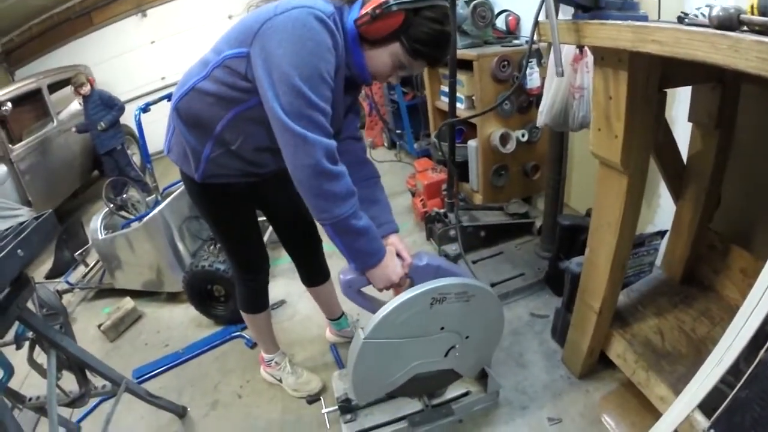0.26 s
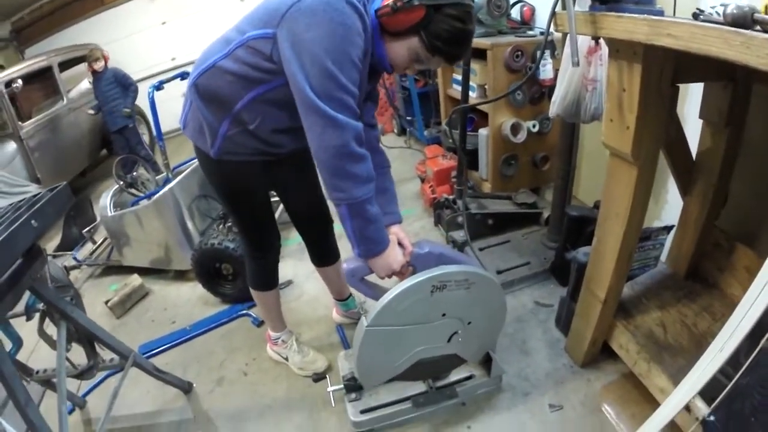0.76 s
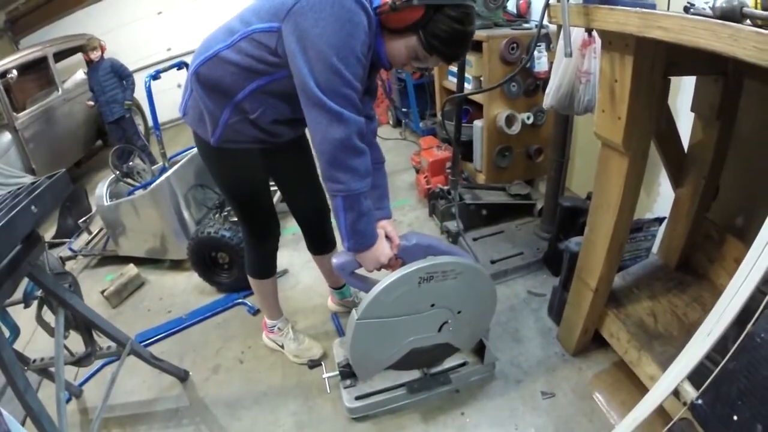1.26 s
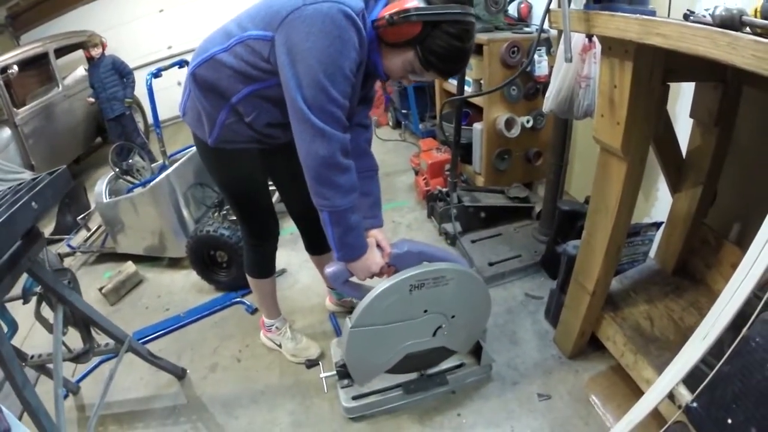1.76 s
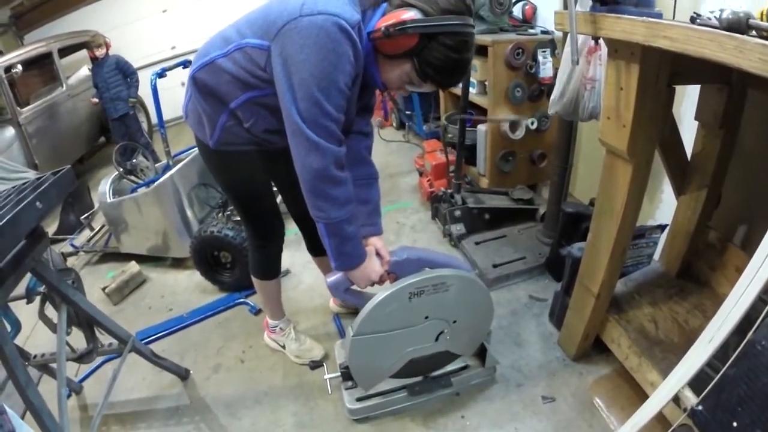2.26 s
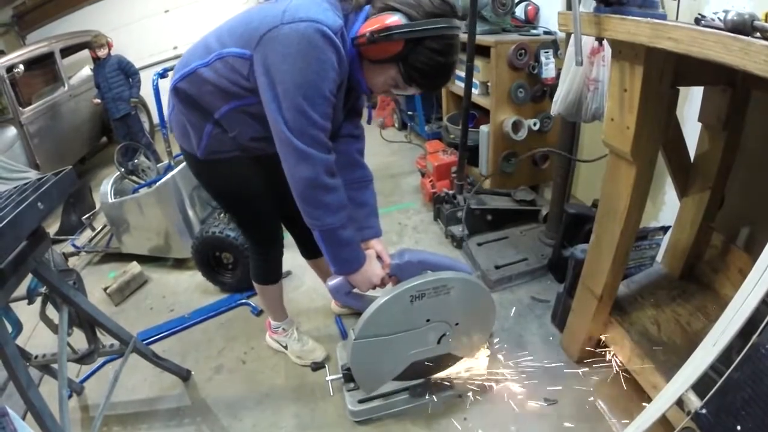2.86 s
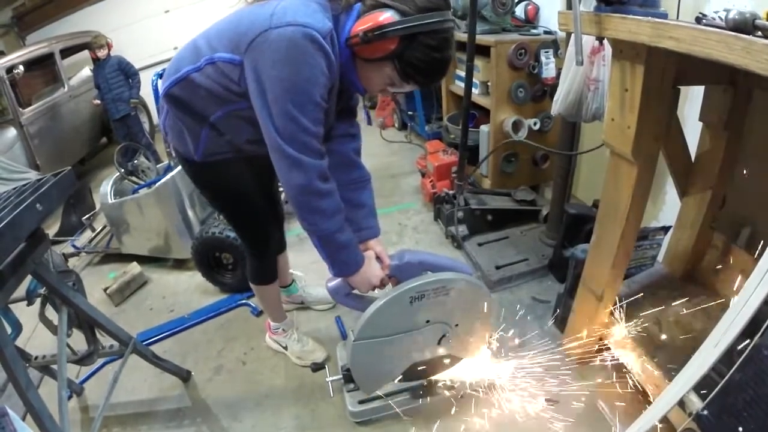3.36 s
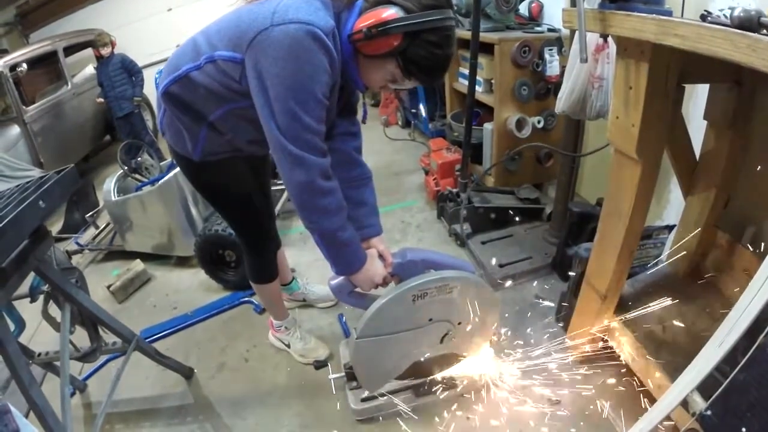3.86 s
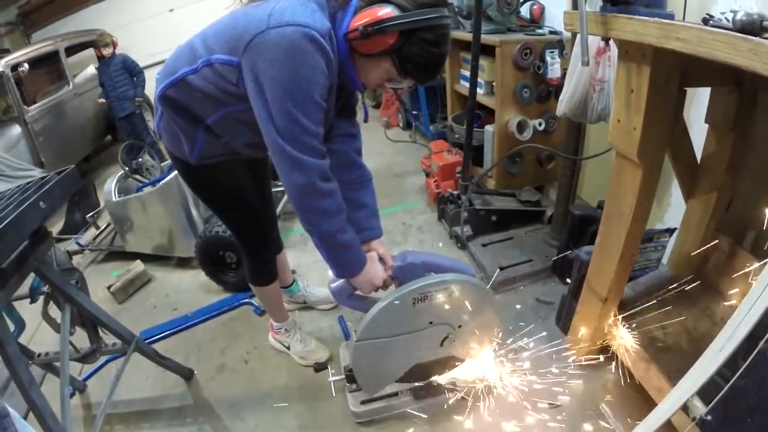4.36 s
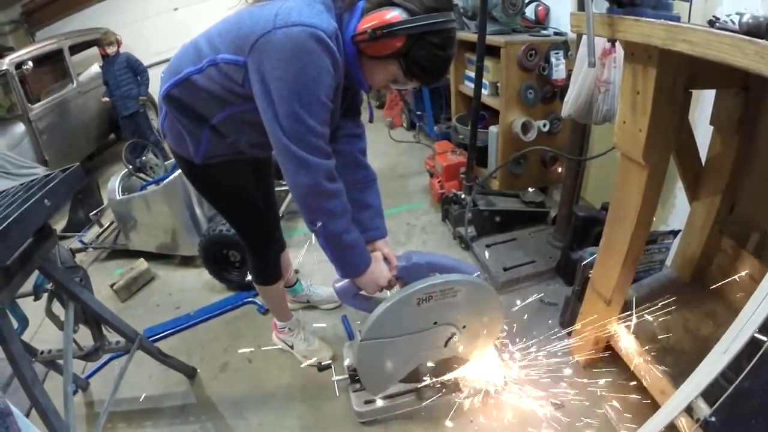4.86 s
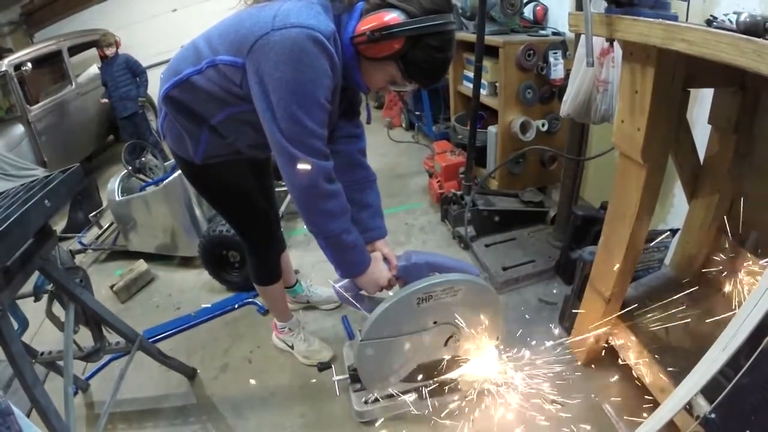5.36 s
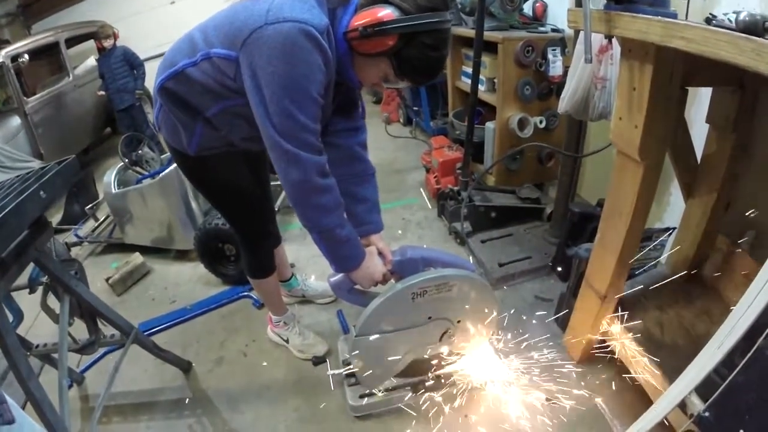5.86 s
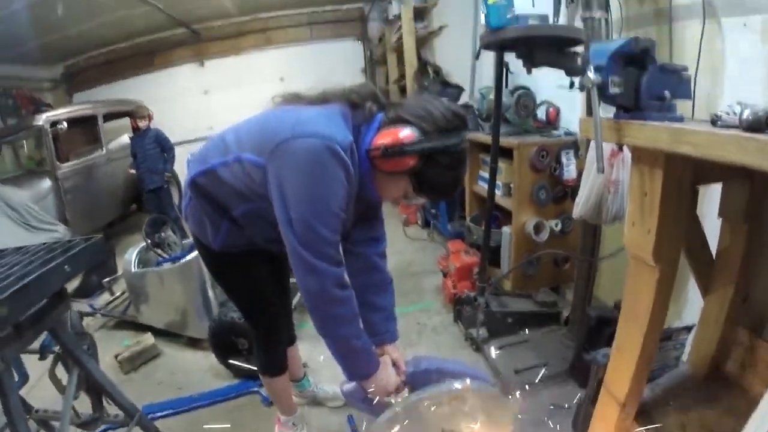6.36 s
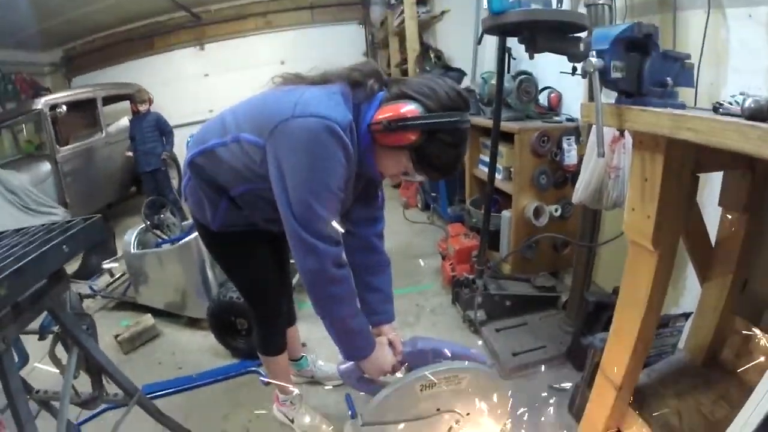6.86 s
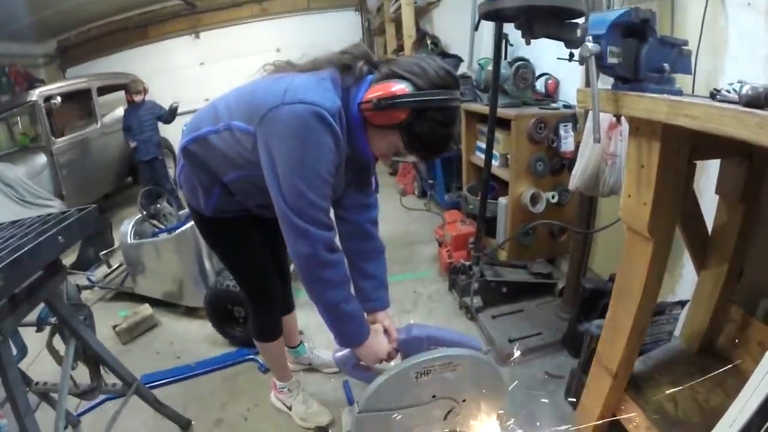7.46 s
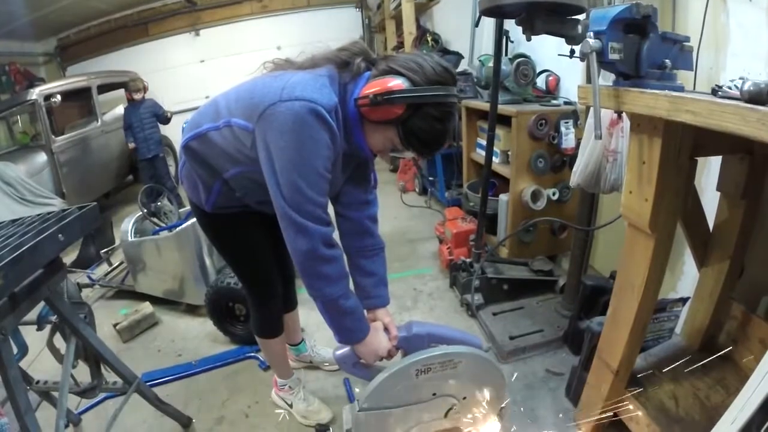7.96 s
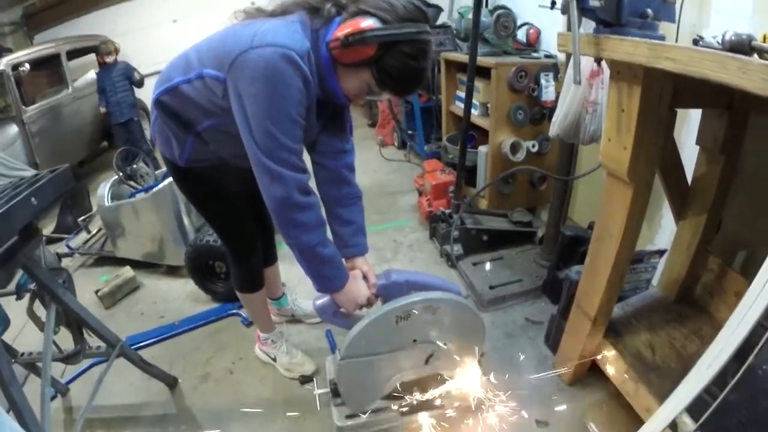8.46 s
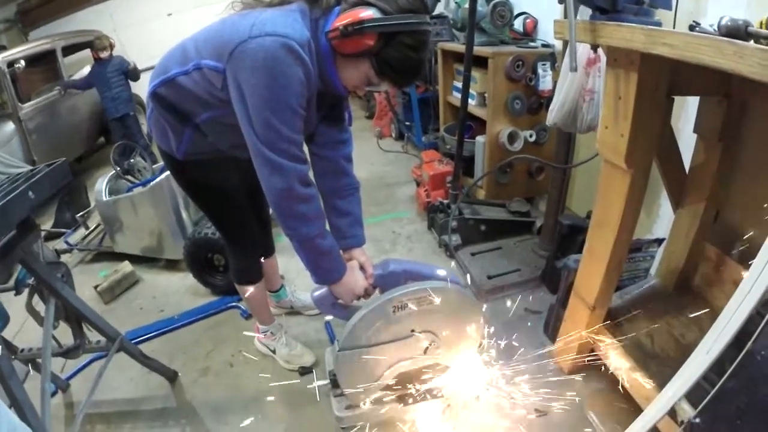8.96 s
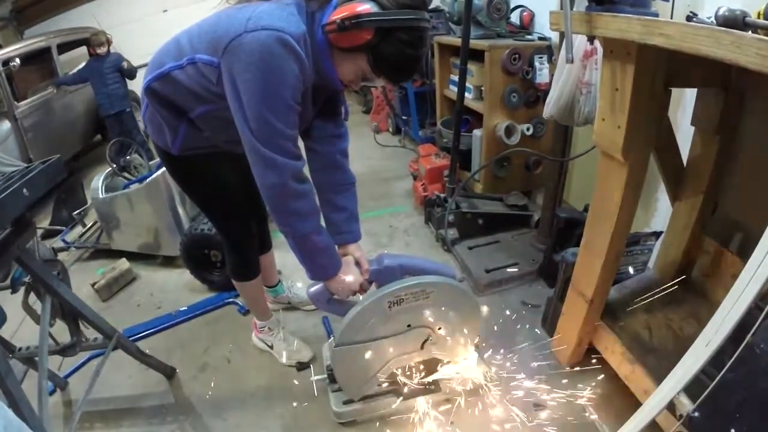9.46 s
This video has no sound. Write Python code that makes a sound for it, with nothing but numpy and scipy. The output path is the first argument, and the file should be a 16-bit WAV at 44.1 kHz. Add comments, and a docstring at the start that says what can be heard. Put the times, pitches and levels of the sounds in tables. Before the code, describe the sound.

A cut-off saw hums and whines freely, then bites into steel with a gritty screech and fizzing sparks as the motor slows.

```python
"""First comes the hum, gear whine and rushing air of a chop saw speeding up in a garage.
Its gritty wheel touches a steel bar with a fizz of sparks, then bites in, and the motor slows.
The same grit passes the steel on every turn and slowly wears, so the grinding is a harsh buzz and
screech that follow the speed, while the bar rings. Loudness follows four things: the run-up,
the bite, the load on the motor and the depth of the slot."""
import sys
import numpy as np
from scipy import signal
from scipy.fft import rfft, irfft, next_fast_len
from scipy.io import wavfile
from scipy.ndimage import uniform_filter1d, map_coordinates

SR = 44100
rng = np.random.default_rng(int(sys.argv[2]) if len(sys.argv) > 2 else 0)


def dump(signal):
    """Clip the signal to [-1, 1] and save it as 16-bit WAV at the path in sys.argv[1]."""
    limited = np.clip(np.atleast_2d(signal).T, -1, 1)
    pcm = np.round(limited * 32767).astype(np.int16)
    wavfile.write(sys.argv[1], SR, pcm)


N = 428652
T = np.arange(N) / SR
SMALL_GEAR_TEETH, BIG_GEAR_TEETH = 6, 40
TOUCH_S, BITE_S, SEATED_S = 2.41, 3.09, 3.56  # the wheel grazes, is pressed in, settles in its slot


def amp(db):
    """Turns decibels into a gain."""
    return 10 ** (np.asarray(db) / 20)


def evened(x):
    """Scales a signal to an average power of 1."""
    return x / np.sqrt(np.mean(abs(x) ** 2) + 1e-20)


def curve(rows):
    """Joins a table's points in time with straight lines."""
    return np.interp(T, *np.transpose(rows))


def ramp(start_s, rise_s):
    """Rises from 0 to 1, then stays there."""
    return np.clip((T - start_s) / rise_s, 0, 1)


def read(points, hz):
    """Looks up a table's value at any pitch."""
    pitches, values = np.transpose(points)
    return np.interp(np.log(hz + 1), np.log(pitches + 1), values)


def peaked(hz, peaks):
    """The boost a part gives near its resonances, the pitches it likes to ring at."""
    boosts = [1 + (amp(db) - 1) / np.hypot(1, (2 * (hz - centre) / width) ** 2)
              for centre, width, db in peaks]
    return np.prod(boosts, axis=0)


def colour(x, spectrum, peaks=()):
    """Shapes a sound's lows and highs, adds resonances and sets its power to 1."""
    size = next_fast_len(N + SR // 10)
    hz = np.fft.rfftfreq(size, 1 / SR) + 1
    edge_fade = np.minimum(hz / spectrum[0][0], 1) * np.minimum(spectrum[-1][0] / hz, 1)
    gain = amp(read(spectrum, hz)) * edge_fade ** 2 * peaked(hz, peaks)
    return evened(irfft(rfft(x, size) * gain, size)[:N])


def wander(per_s):
    """A random drift that changes about per_s times a second."""
    knots = rng.standard_normal(8192)
    return evened(np.interp(T * per_s, np.arange(len(knots)), knots))


def sing(x, start, end, hz, width_hz, db):
    """Lets x shake one resonance for a while; the tone swells and fades."""
    on = (T > start) & (T < end)
    spin = np.exp(2j * np.pi * np.cumsum((hz * np.ones(N))[on]) / SR)
    decay = np.exp(-2 * np.pi * width_hz / SR)
    swing = evened(signal.lfilter([(1 - decay) ** 2], [1, -2 * decay, decay ** 2], x[on] / spin))
    tone = (spin * swing / np.hypot(.5, abs(swing))).real  # friction limits the swing
    fade = np.clip(np.minimum(T[on] - start, end - T[on]) / 0.084, 0, 1)
    out = np.zeros(N)
    out[on] = amp(db) * evened(tone) * fade
    return out


# How fast the motor spins: time_s, turns_per_s
MOTOR_SPEED = [(0, 375.5), (.2, 382.9), (.7, 395.8), (1.4, 407), (2.4, 415.8), (3.15, 409.8), (3.8, 382.6),
               (4.2, 368.7), (5.3, 340.5), (6.35, 318.6), (7.12, 315), (7.4, 322.3), (8.5, 335.6),
               (8.8, 332.8), (9.3, 319.5), (9.72, 330)]
def speed():
    """Motor turns a second, smoothed because heavy parts change speed slowly."""
    return uniform_filter1d(curve(MOTOR_SPEED), size=6000, mode="nearest")


def level(db, run_up_db=0, bite_db=0, load_db=0, depth_db=0):
    """A layer's gain: db when running free, plus a share of each of the other four."""
    free_turns_per_s, full_load_drop = 423, 98
    run_up = np.exp(-T / 2.03)
    bite = ramp(BITE_S, 0.11)
    load = np.maximum(free_turns_per_s - speed(), 0) / full_load_drop * (T > TOUCH_S)
    depth = ramp(TOUCH_S, 1 / 0.17)  # the slot gains 17% of its full depth a second
    return amp(db + run_up_db * run_up + bite_db * bite + load_db * load + depth_db * depth)


# How well the casing lets the hum out: pitch_hz, gain_db
HUM_GAIN = [(316, -16), (333, -9), (352, -16.5), (370, -11), (383, -12.5), (396, -6.5), (414, -2)]
# Steady tones of the spinning motor and wheel: cycles_per_motor_turn, level_db
MOTOR_TONES = [(1.148, -22), (1.3, -24.5), (1.35, -21), (1.648, -19.5), (2, -17), (2.1, -23.5),
               (2.573, -13.5), (12, -20)]
# Casing resonances: pitch_hz, width_hz, boost_db
CASING_PEAKS = [(534, 31, 5.5), (681, 24, 6.5), (854, 25, 10.5)]
def motor(turns):
    """The motor hums once a turn; weaker motor and wheel tones swell near the casing's resonances."""
    rate = speed()
    jolt = 1 + 2.2 * ramp(BITE_S, 0.91)  # cutting makes the tones waver more
    hum = np.sin(2 * np.pi * turns + 0.1 * jolt * wander(25))
    hum *= amp(read(HUM_GAIN, rate) + 0.6 * jolt * wander(13))
    hum *= level(-16, run_up_db=5, load_db=-9)
    tones = np.zeros(N)
    for cycles, db in MOTOR_TONES:
        gain = amp(db + 3.6 * wander(14)) * peaked(cycles * rate, CASING_PEAKS)
        tones += gain * np.sin(2 * np.pi * (cycles * turns + rng.random()) + 0.29 * jolt * wander(22))
    tones *= level(-18, run_up_db=1, load_db=-8.5, depth_db=-7)
    return np.sqrt(2) * (hum + tones)


# Gearbox resonances: pitch_hz, width_hz, boost_db
GEARBOX_PEAKS = [(2060, 83, 8.5), (2213, 23, 3.5), (2384, 92, 3.4)]
def gears(wheel):
    """Teeth meet unevenly round the big gear, so the whine has extra tones just above and below it."""
    whine = np.zeros(N)
    for step in range(-3, 4):
        gain = amp(-7 * abs(step) ** 0.25 + 0.62 * step + 2.4 * wander(12))
        phase = 2 * np.pi * (BIG_GEAR_TEETH + step) * wheel + 0.5 * wander(16)
        whine += gain * np.sin(phase + 2 * np.pi * rng.random())
    rattle = sing(rng.standard_normal(N), -1, T[-1] + 1, SMALL_GEAR_TEETH * speed(), width_hz=120, db=-1)
    boxed = colour(whine + rattle, [(1500, 0), (3000, 0)], GEARBOX_PEAKS)
    return boxed * level(-31, run_up_db=11.5, bite_db=4, load_db=-3.5, depth_db=-2.5)


# Tones in the knocking: cycles_per_wheel_turn, level_db
KNOCK_TONES = [(2, -14), (3, -12), (4, -8), (5, -11), (6, -2.5), (7, 1), (8, -0.5)]
# Resonances of the saw's base: pitch_hz, width_hz, boost_db
BASE_PEAKS = [(107, 8.9, 10), (151, 4.2, 10.3), (182.5, 8.8, 7.9), (210, 10, 11), (343, 13, 7.9),
              (464, 22, 7.3)]
def shaking_base(wheel):
    """The unbalanced wheel shakes the base, and its high side knocks once a turn."""
    shake = np.sqrt(2) * np.sin(2 * np.pi * wheel) * amp(0.75 * wander(10))
    shake *= level(-56, run_up_db=6, load_db=-1.5, depth_db=-6)
    rumble = colour(rng.standard_normal(N), [(25, -1), (60, -12), (120, 3)])
    rumble *= level(-54, run_up_db=-1, load_db=-1.5, depth_db=-2)
    tones = sum(amp(db + 4 * wander(5)) * np.sin(2 * np.pi * cycles * wheel + 0.83 * wander(16))
                for cycles, db in KNOCK_TONES)
    knock = colour(tones, [(60, 0), (900, 0)], BASE_PEAKS) * level(-40, run_up_db=8, load_db=-7.5)
    return shake + rumble + knock


# Air round the wheel: pitch_hz, relative_db
ROAR_SPECTRUM = [(100, -32), (250, -11.5), (330, -13), (500, -1), (620, -11), (760, -4), (1050, 1.5),
                 (1280, 0), (1550, -13), (2000, -9), (3000, -16)]
# Wheel guard resonances: pitch_hz, width_hz, boost_db
GUARD_PEAKS = [(321, 18, 7.3), (549, 53, 8.6), (683.4, 56, 8.8), (867, 23.6, 13.1)]
# Air from the fan: pitch_hz, relative_db
HISS_SPECTRUM = [(1200, -25), (1700, -9.5), (2500, -6), (3500, 2.5), (4000, -3.5), (4500, -11),
                 (5500, -11.5), (6400, -8.5), (7500, -17.5), (9000, -21), (10600, -22.5), (12000, -31),
                 (15000, -39)]
def air():
    """Air dragged round by the wheel roars in the guard, and the cooling fan hisses."""
    roar = colour(rng.standard_normal(N), ROAR_SPECTRUM, GUARD_PEAKS) * amp(0.59 * wander(11))
    hiss = colour(rng.standard_normal(N), HISS_SPECTRUM) * amp(wander(16))
    return roar * level(-19.5, load_db=-4, depth_db=-7.5) + hiss * level(-26.5, run_up_db=8.5, load_db=-1)


def worn(shape, life_turns):
    """Rows of noise, one a turn; each is a slightly worn copy of the last."""
    kept = np.exp(-1 / life_turns)
    fresh = rng.standard_normal(shape)
    fresh[1:] *= np.sqrt(1 - kept ** 2)
    return signal.lfilter([1], [1, -kept], fresh, axis=0)


# How much of the grinding repeats each turn: time_s, share_0_to_1
REPEAT_SHARE = [(2.4, 0.5), (3.2, 1), (4.4, 0.93), (5.5, 0.92), (8.6, 0.9), (9.4, 0.8)]
def rim(wheel, lump_db, spacing_db, life_turns=44):
    """Grit passes as the wheel turns; some grain spacings stand out, and high spots bite harder."""
    rows, spots = shape = (620, 1024)
    spacing = evened(uniform_filter1d(worn((rows, spots // 2 + 1), life_turns=44), size=7, axis=1))
    grit = irfft(rfft(worn(shape, life_turns), axis=1) * amp(spacing_db * spacing), axis=1)
    lumps = evened(uniform_filter1d(worn(shape, life_turns=32), size=60, axis=1, mode="wrap"))
    grit *= amp(lump_db * lumps)
    grit /= grit.std(axis=1, keepdims=True)
    repeating = map_coordinates(grit.ravel(), [wheel * spots], order=3, mode="wrap")
    share = curve(REPEAT_SHARE)
    return np.sqrt(share) * repeating + np.sqrt(1 - share) * rng.standard_normal(N)


# How long the garage's echo takes to fall 60 dB: pitch_hz, fade_s
ECHO_FADE = [(200, 0.15), (1000, 0.82), (4000, 0.56), (14000, 0.2)]
def garage(x, echo_db):
    """Adds scattered echoes from the walls; middle pitches last longest."""
    size = SR // 2
    echoes = rng.standard_normal(size) * (rng.random(size) < .06) * (np.arange(size) > .003 * SR)
    hz, t, bands = signal.stft(echoes, SR, nperseg=256)
    tail = signal.istft(bands * amp(-60 * t / read(ECHO_FADE, hz)[:, None]), SR, nperseg=256)[1]
    return evened(x + amp(echo_db) * signal.fftconvolve(x, tail / np.linalg.norm(tail))[:N])


# Grit heard through the frame: pitch_hz, relative_db
RASP_SPECTRUM = [(150, -13.5), (195, -7), (245, -11.5), (295, -7.5), (450, -5), (900, -5.5), (1300, -13),
                 (1550, -1.5), (1800, -3), (2450, -1), (2750, -4), (3100, 0), (3500, 0.5), (4100, -2.5),
                 (4600, -7), (5500, -9)]
# Bar resonances that last the whole cut: pitch_hz, width_hz, boost_db
STEEL_PEAKS = [(2704, 25, 6), (3065, 50, 5.5), (3520, 90, 3), (3990, 60, 7.5), (5170, 110, 6),
               (5530, 80, 7), (5820, 80, 3.5), (6250, 60, 7)]
def grit_rasp(wheel):
    """Grit scrapes the steel and rasps through the saw's frame."""
    scrape = garage(rim(wheel, lump_db=2.5, spacing_db=1.3), echo_db=-3)
    rasp = colour(scrape, RASP_SPECTRUM, GUARD_PEAKS + STEEL_PEAKS)
    return rasp * level(-24.5, bite_db=5.5, load_db=-1, depth_db=-3)


# The bar's bright ringing: pitch_hz, relative_db
RING_SPECTRUM = [(4000, -54), (4800, -8), (5150, -10.5), (5600, -1.5), (6300, -2), (6750, -4.5),
                 (7300, -1.5), (7750, -4.5), (8250, 0), (8700, -9.5), (9100, -11), (10000, -27)]
# Bar notes that come and go: start_s, end_s, pitch_hz, width_hz, level_db
BAR_NOTES = [(2.3, 2.6, 12130, 50, -39.5), (2.498, 3.3, 12200, 220, -47), (3.3, 5.4, 2210, 170, -29.5),
             (5.4, 7.45, 2030, 28, -34), (2.3, 3.6, 7500, 600, -42), (3, 6, 8130, 76, -47),
             (4.4, 5.6, 4190, 85, -35), (5.9, 7, 8930, 74, -40), (3.55, 5.9, 5170, 130, -33.5),
             (7.35, 10, 2040, 20, -31)]
def ringing_bar(wheel):
    """Grit rings the bar, louder once the wheel settles; the notes change as the slot deepens."""
    scrape = garage(rim(wheel, lump_db=-1.5, spacing_db=2.3), echo_db=-3)
    ring = colour(scrape, RING_SPECTRUM, STEEL_PEAKS) * amp(6 * ramp(SEATED_S, 0.12))
    ring *= level(-33.5, bite_db=2.5, load_db=1.5, depth_db=2.5)
    return ring + sum(sing(scrape, *note) for note in BAR_NOTES)


# The fizz of sparks: pitch_hz, relative_db
SPARK_SPECTRUM = [(7500, -6), (9300, 2), (10000, -2), (10700, 3), (11400, -0.5), (12300, -0.5), (13500, 0),
                  (14500, -5), (15300, -9.5)]
def sparks(grit):
    """Sparks fizz off the wheel, with a first flash as the bar's corner is ground away."""
    flash_db = 11 * np.exp(-abs(T - TOUCH_S) / 0.13)
    fizz = colour(grit, SPARK_SPECTRUM) * amp(flash_db + 1.4 * wander(45) + 0.35 * wander(15))
    return fizz * level(-44, bite_db=2.5, load_db=11, depth_db=5.5)


# How hard the wheel rubs the side of the slot: time_s, swing_db
SIDE_RUB = [(6, 0.5), (6.5, 0), (7.1, 2.5), (7.7, 1), (8.5, 0.5), (9.7, 2.5)]
def wobble(wheel):
    """The wobbling wheel rubs the slot once a turn; this gain makes the ringing pulse."""
    swing_db = curve(SIDE_RUB)
    mean_power = np.i0(np.log(amp(2 * swing_db)))
    return amp(swing_db * np.cos(2 * np.pi * wheel)) / np.sqrt(mean_power)


def wheel_tones(wheel, tones, swell_s, waver_rad, flicker_db):
    """Tones that repeat a whole number of times a wheel turn; each swells and fades."""
    out = np.zeros(N)
    for start, end, cycles, db in tones:
        swell = np.clip(np.minimum(T - start, end - T) / swell_s + .5, 0, 1)
        on = swell > 0
        phase = 2 * np.pi * (cycles * wheel[on] + rng.random()) + waver_rad * wander(18)[on]
        out[on] += np.sqrt(2) * swell[on] * amp(db + flicker_db * wander(20)[on]) * np.sin(phase)
    return out


# Screech and gear-whine tones: start_s, end_s, cycles_per_wheel_turn, level_db
SCREECH_TONES = [(3.1, 3.46, 37, -32.5), (3.55, 3.95, 88, -33.0), (3.58, 4.24, 53, -33.5),
                 (3.6, 4.1, 89, -34.5), (3.6, 4.12, 39, -31.0), (3.72, 4.38, 91, -35.0),
                 (3.8, 4.48, 40, -30.0), (4.04, 4.82, 38, -34.0), (4.18, 4.54, 63, -33.5),
                 (4.18, 4.66, 41, -30.5), (4.3, 4.7, 96, -33.0), (4.5, 4.86, 78, -34.0),
                 (4.52, 4.94, 42, -33.5), (4.64, 5.18, 39, -30.5), (4.7, 5.15, 98, -34.0),
                 (4.8, 5.5, 156, -38.0), (4.92, 6.18, 60, -35.0), (4.96, 5.48, 40, -25.5),
                 (5.1, 5.5, 69, -33.5), (5.14, 6.0, 41, -34.0), (5.3, 5.9, 102, -34.0),
                 (5.32, 5.82, 54, -35.0), (5.5, 6.05, 103, -34.0), (5.7, 6.16, 40, -29.5),
                 (6.26, 6.84, 113, -33.5), (6.28, 7.24, 124, -36.0), (6.3, 7.24, 161, -35.5),
                 (6.32, 6.8, 144, -36.0), (6.32, 7.2, 176, -33.0), (6.36, 6.9, 168, -36.0),
                 (6.38, 7.42, 121, -33.5), (6.4, 7.12, 223, -37.0), (6.42, 6.98, 178, -37.5),
                 (6.42, 7.3, 122, -35.5), (6.46, 7.28, 123, -35.5), (6.52, 7.22, 132, -22.5),
                 (6.58, 7.22, 163, -35.0), (6.62, 7.18, 125, -35.5), (6.7, 7.25, 58, -33.0),
                 (6.74, 7.28, 59, -34.0), (7.3, 8.3, 60, -35.0), (7.34, 7.86, 118, -33.0),
                 (7.34, 8.0, 129, -33.5), (7.34, 8.46, 113, -32.0), (7.5, 8.18, 222, -37.5),
                 (7.5, 8.26, 160, -37.0), (7.56, 8.18, 164, -36.5), (7.58, 8.42, 40, -28.5),
                 (7.58, 9.22, 125, -32.0), (7.6, 8.14, 150, -36.5), (7.62, 8.28, 127, -31.5),
                 (7.72, 8.7, 149, -36.0), (7.78, 8.8, 79, -35.0), (7.82, 8.92, 122, -34.5),
                 (7.84, 8.38, 80, -35.0), (7.86, 8.3, 63, -32.5), (7.92, 8.38, 123, -34.0),
                 (7.96, 8.38, 41, -30.5), (8.02, 8.9, 73, -35.0), (8.04, 8.84, 146, -36.0),
                 (8.22, 8.88, 168, -36.0), (8.24, 8.88, 110, -34.0), (8.26, 9.28, 60, -34.0),
                 (8.3, 8.84, 61, -34.0), (8.4, 9.04, 160, -35.5), (8.62, 9.9, 113, -33.0),
                 (8.66, 9.12, 41, -33.5), (8.7, 9.06, 63, -34.0), (8.84, 9.5, 115, -32.5),
                 (8.94, 9.9, 129, -34.0), (9.08, 9.52, 132, -34.5), (9.1, 9.5, 171, -35.0),
                 (9.1, 9.9, 65, -35.0), (9.45, 9.9, 41, -33.0)]
def screech(wheel):
    """Screech and gear-whine tones come and go in the cut, following the wheel's speed."""
    tones = wheel_tones(wheel, SCREECH_TONES, swell_s=0.37, waver_rad=0.48, flicker_db=1.83)
    return tones * level(-0.5, depth_db=1.2)


# Low tones of the growl: start_s, end_s, cycles_per_wheel_turn, level_db
GROWL_TONES = [(3.15, 3.42, 3, -41), (3.18, 3.68, 8, -25.5), (3.15, 3.42, 9, -26), (3.6, 3.8, 10, -30),
               (3.65, 4.02, 15, -30.5), (3.8, 4.75, 2, -47), (3.9, 4.12, 12, -28.5), (3.95, 4.5, 6, -30),
               (4.45, 4.98, 4, -39.5), (4.68, 4.96, 6, -27.5), (4.8, 5.38, 3, -42), (5.35, 5.64, 17, -26),
               (9.1, 9.45, 10, -34)]
def growl(wheel):
    """Slow chatter growls through the frame as the wheel bites and strains."""
    return wheel_tones(wheel, GROWL_TONES, swell_s=0.14, waver_rad=0.44, flicker_db=2)


# Notes of evenly spaced grit: start_s, end_s, cycles_per_wheel_turn, width_hz, level_db
GRIT_NOTES = [(5.197, 6.8, 265, 400, -52), (6.303, 8.2, 223, 420, -36), (8.997, 10, 246, 143, -36)]
def singing_grit(grit):
    """Evenly spaced grains hit the steel in step and sing for a while."""
    wheel_hz = speed() * SMALL_GEAR_TEETH / BIG_GEAR_TEETH
    return sum(sing(grit, start, end, cycles * wheel_hz, width, db)
               for start, end, cycles, width, db in GRIT_NOTES)


def scene():
    """One motor drives everything; both ears hear the same sound."""
    turns = np.cumsum(speed()) / SR
    wheel = turns * SMALL_GEAR_TEETH / BIG_GEAR_TEETH  # wheel turns so far
    machine = motor(turns) + gears(wheel) + shaking_base(wheel) + growl(wheel) + air()
    rasp = grit_rasp(wheel)
    ring = ringing_bar(wheel)
    coarse_grit = garage(rim(wheel, lump_db=6, spacing_db=1, life_turns=19), echo_db=6)
    fizz = sparks(coarse_grit)
    ringing = wobble(wheel) * (ring + singing_grit(coarse_grit) + screech(wheel))
    contact = ramp(TOUCH_S, 0.035) * amp(0.5 * wander(22))  # the hand never presses quite evenly
    saw = machine + contact * (rasp + fizz + ringing)
    return np.array([saw, saw])


def record(dry):
    """Takes away the very highest treble."""
    cutoff_hz = 15350
    low_pass = signal.firwin(511, cutoff_hz, window=("kaiser", 9), fs=SR)
    return signal.oaconvolve(dry, low_pass[None], "same")


dry = scene()
out = record(dry)
dump(out)
```